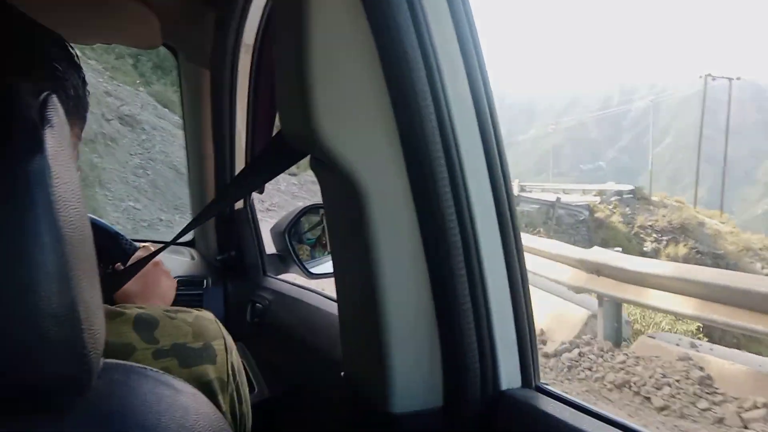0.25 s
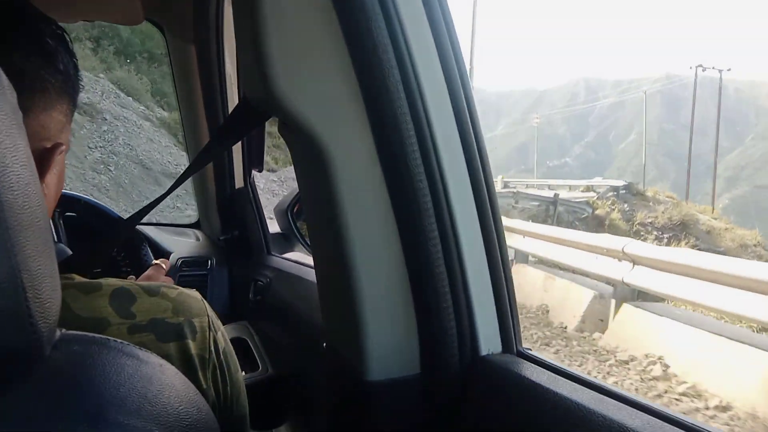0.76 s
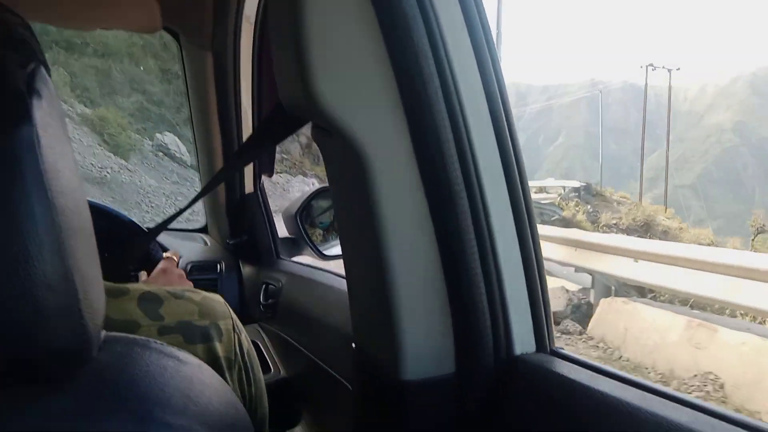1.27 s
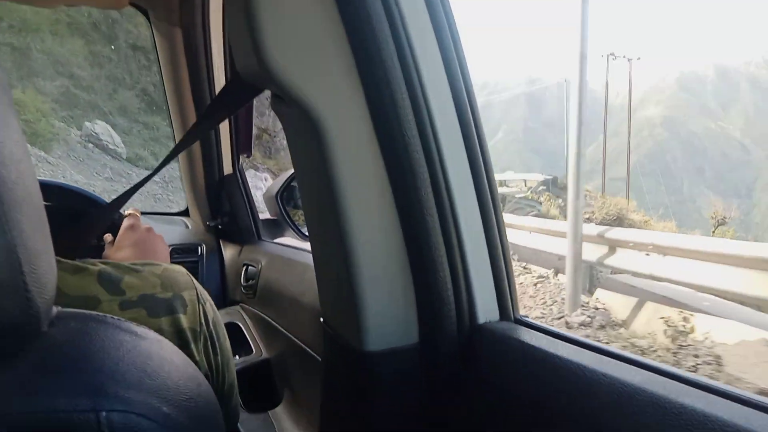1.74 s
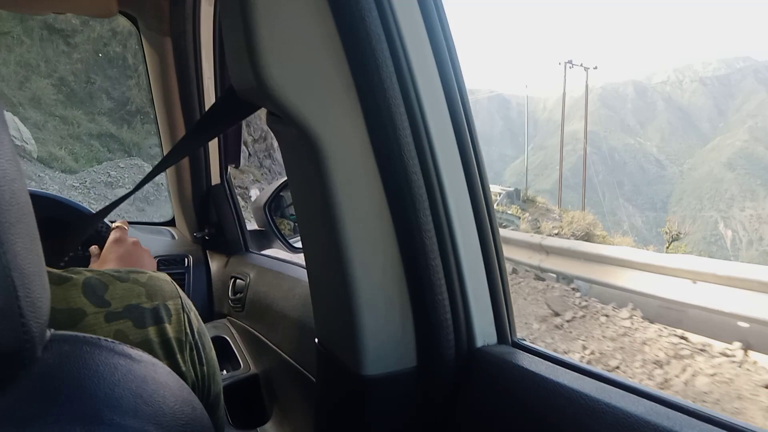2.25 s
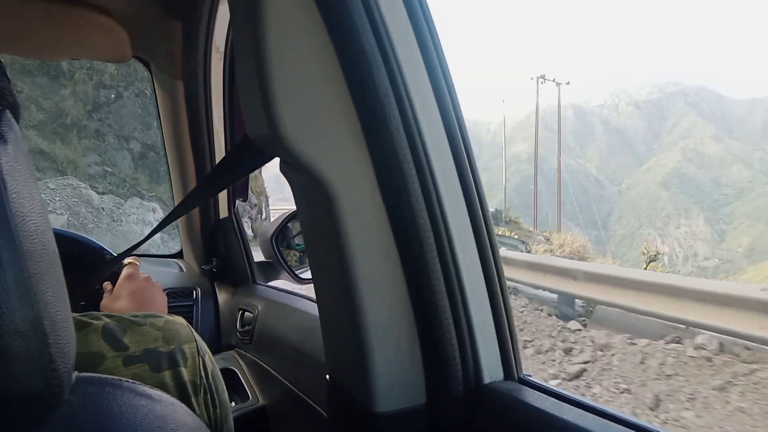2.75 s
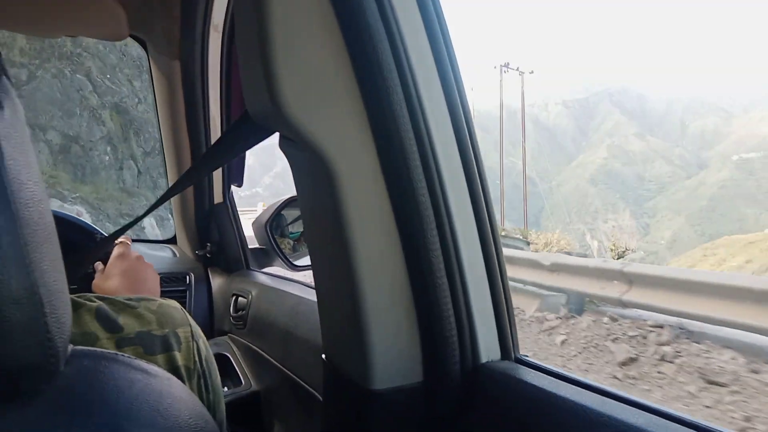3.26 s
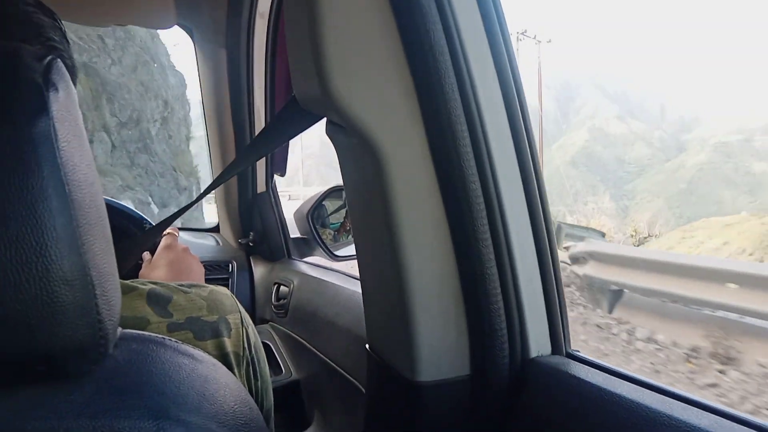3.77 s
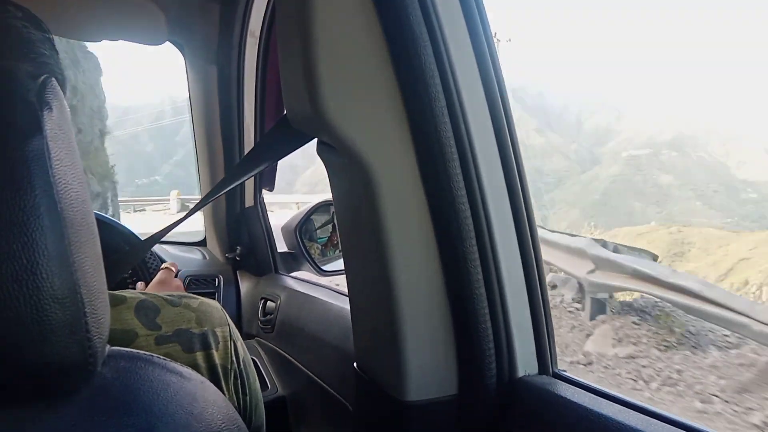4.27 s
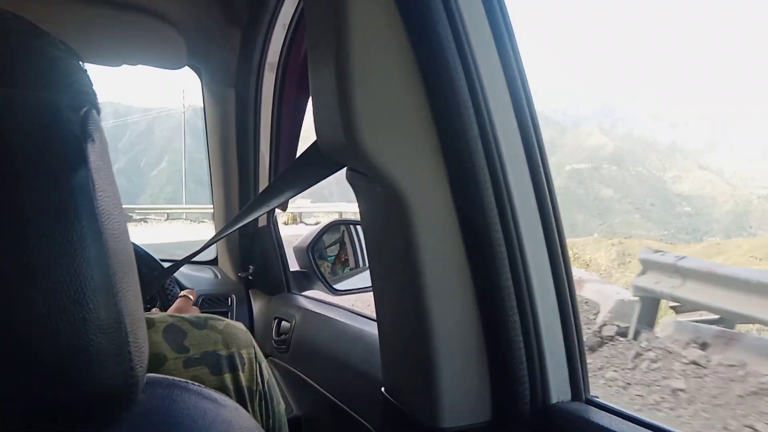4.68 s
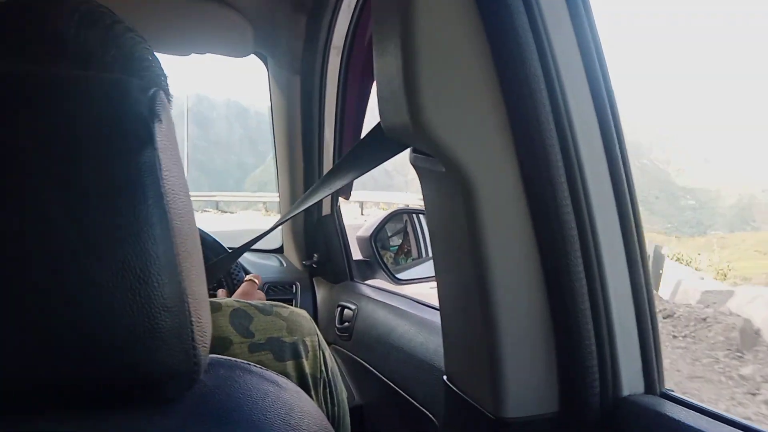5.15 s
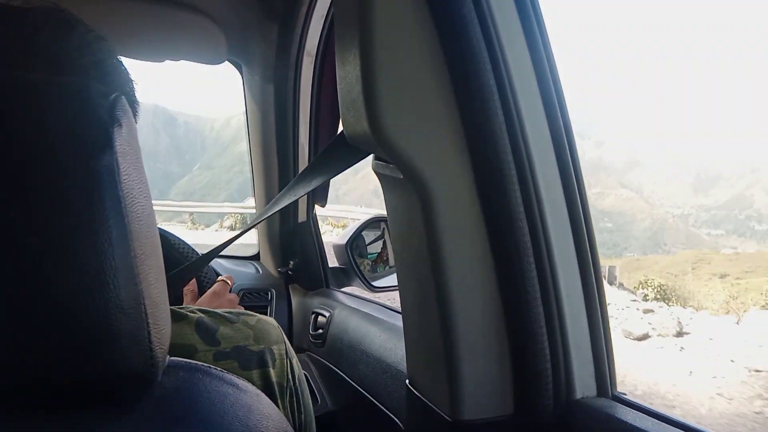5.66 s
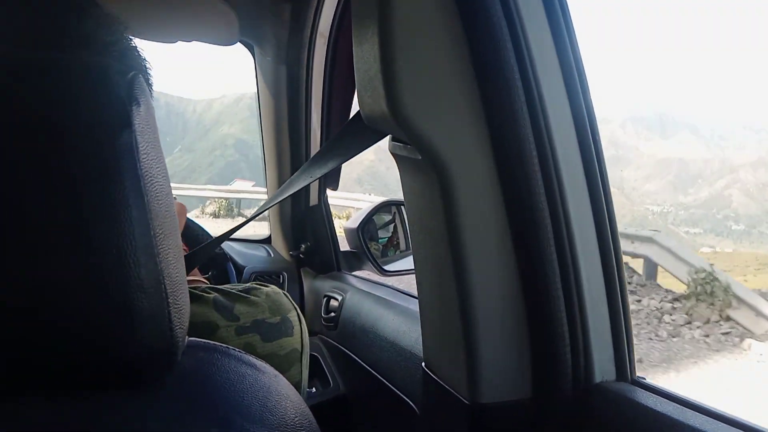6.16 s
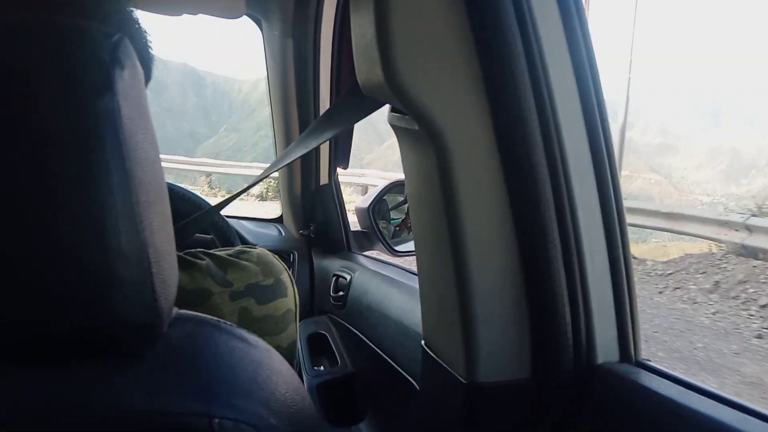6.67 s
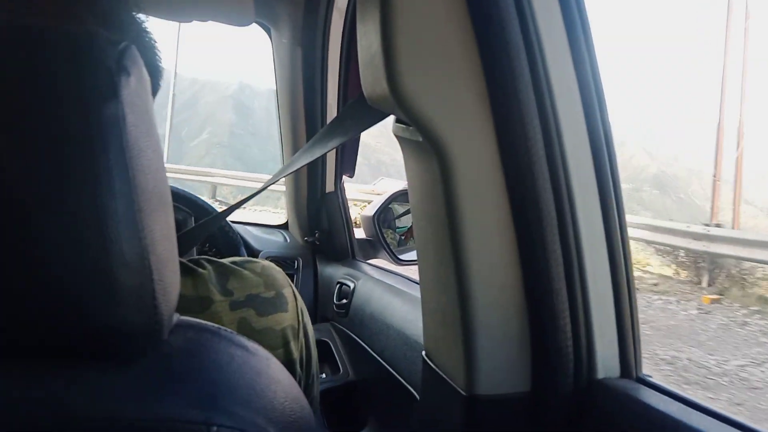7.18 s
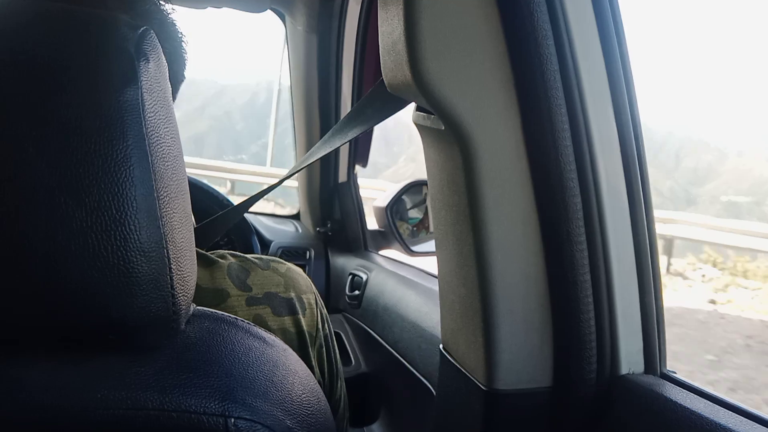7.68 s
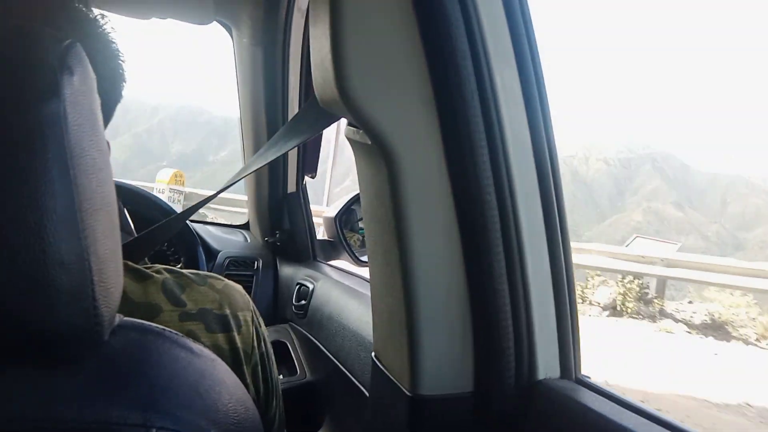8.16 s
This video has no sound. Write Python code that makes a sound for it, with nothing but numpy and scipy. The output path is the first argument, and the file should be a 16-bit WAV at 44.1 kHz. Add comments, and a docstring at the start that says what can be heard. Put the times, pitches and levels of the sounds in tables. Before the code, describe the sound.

Inside a moving car on a gritty mountain road, low cabin boom and tyre hiss, trim rattles and clicks, a brief two-note horn at the end.

```python
"""Inside a car on a rough mountain road: the cabin booms with road and engine, under a faint wavering whine.
Shaped noise makes the tyres hiss over grit, run quietly through a bend and reach grit again.
All along, short noise bursts make the trim click, snap and rustle, with one crisp scratch late on.
At the end the driver taps the two-note horn, two stacks of harmonics with shifting reflections."""
import sys
import numpy as np
from scipy import signal
from scipy.fft import rfft, irfft, next_fast_len
from scipy.io import wavfile
from scipy.ndimage import uniform_filter1d, map_coordinates

SR = 44100
rng = np.random.default_rng(int(sys.argv[2]) if len(sys.argv) > 2 else 0)


def bounce(signal):
    """Save signal as a 16-bit WAV file at the path given by the first command-line argument."""
    frames = np.transpose(np.atleast_2d(signal))
    limited = np.clip(frames, -1, 1)
    pcm = np.round(limited * 32767).astype(np.int16)
    wavfile.write(sys.argv[1], SR, pcm)


N = 371322
TOP_HZ = 15580  # upper limit of the sound

# bright tick of trim contacts and pebbles: freq_hz, relative level_db (per Hz)
CLICK_SPECTRUM = [(900, -19), (2000, 5.5), (3500, 0), (4600, -7), (5900, 10), (6600, -3.5), (7500, -8.5),
                  (10000, -13.5), (11500, -28), (13500, -30.5), (15300, -16)]


def amp(db):
    """Decibels to gain."""
    return 10 ** (np.asarray(db) / 20)


def unit(x):
    """Scale to rms 1."""
    return x / np.sqrt(np.mean(x ** 2) + 1e-20)


def along(points, hz):
    """Read (Hz, value) points on a log frequency axis."""
    f, v = np.transpose(points)
    return np.interp(np.log(hz + 1), np.log(f), v)


def curves(rows):
    """One value per sample for each column after the time."""
    s, *cols = np.transpose(rows)
    return [np.interp(np.arange(N) / SR, s, c) for c in cols]


def wobble(rate):
    """A smooth random curve, rate knots a second."""
    knots = rng.standard_normal(int(N * rate / SR) + 4)
    return map_coordinates(knots, [np.arange(N) * rate / SR])


def filtered(x, response):
    """x filtered by a response given as a function of frequency."""
    size = next_fast_len(N + SR // 2)
    hz = np.fft.rfftfreq(size, 1 / SR)
    return irfft(rfft(x, size) * response(hz), size)[:N]


def coloured(x, spectrum):
    """x through a (Hz, dB) spectrum, at rms 1."""
    return unit(filtered(x, lambda hz: amp(along(spectrum, hz))))


def noise(spectrum):
    """Fresh noise of rms 1 with this spectrum."""
    return coloured(rng.standard_normal(N), spectrum)


def steadied(x, span):
    """Keep the quick flutter of x but not its swells longer than span seconds."""
    power = np.abs(uniform_filter1d(x * x, max(int(span * SR), 2)))
    return x / np.sqrt(power + 1e-6)


def patchy(spectrum, patchy_db, size):
    """Noise of rms 1 whose bands swell and fade on their own; a larger size makes narrower, longer patches."""
    z = signal.stft(rng.standard_normal(N), nperseg=size)[2]
    field = uniform_filter1d(rng.standard_normal(z.shape), size=4, axis=0)  # smooth over frequency
    field = uniform_filter1d(field, size=6, axis=1)  # smooth over time
    mottled = signal.istft(z * amp(patchy_db * unit(field)), nperseg=size)[1][:N]
    return coloured(mottled, spectrum)


def crunches(rate, t60):
    """Envelope of many small impacts, rate a second: sudden starts, quick decays, uneven sizes."""
    sizes = amp(np.clip(4 * rng.standard_normal(N), -8, 7))
    starts = (rng.random(N) < rate / SR) * sizes
    decay = amp(-60 * np.arange(SR // 5) / SR / t60)
    return unit(signal.fftconvolve(starts, decay)[:N])


def jolts():
    """Each bump briefly raises or lowers the boom and the tread rumble: two curves in dB."""
    # bumps in the road: centre_s, boom_change_db, tread_change_db
    bump_rows = [(.13, 1, 5), (.85, 3.5, 7), (2.06, 7.5, 2.5), (2.17, 5.5, 3.5), (2.56, 7, -0.5),
                 (2.78, 3.5, -5), (3.0, 4.5, 0), (3.52, 4.5, 4.5), (3.89, 4, -4), (4.12, -0.5, 0.5),
                 (4.39, 1, 0), (5.19, 9.5, 0), (5.58, -0.5, 4.5), (7.07, 10, 5), (7.51, 5.5, 9),
                 (7.97, 5, -3)]
    width_s = 0.045  # from the peak of a change to 1/e of its dB
    t = np.arange(N) / SR
    return sum(np.outer(changes, np.exp(-((t - s) / width_s) ** 2)) for s, *changes in bump_rows)


def body():
    """Road and engine shake the cabin's air mode and its juddering panels; bumps move the boom up or down."""
    # spectra of the air mode, the panels and their judder: freq_hz, relative level_db (per Hz)
    boom_spectrum = [(15, -41), (30, -34.5), (45, -16), (60, -8), (72, -6.5), (84, 6), (98, -1.5),
                     (115, -14.5), (160, -41), (300, -91)]
    drone_spectrum = [(70, -44.5), (110, -2.5), (130, 1), (175, 0.5), (230, -12.5), (280, -12.5),
                      (350, -21), (480, -47), (800, -66.5), (2000, -86.5)]
    judder_spectrum = [(150, -33.5), (210, -1.5), (280, 1), (350, -5), (430, -11), (600, -48.5),
                       (1500, -120)]
    # how hard the road shakes the body, before bumps and offsets: time_s, boom_db, drone_db
    shake = [(0, -28, -27.5), (.5, -29.5, -33), (1.3, -28, -26.5), (1.5, -27, -32.5), (2.7, -26.5, -30),
             (3.4, -26, -33), (4.4, -25, -29), (4.9, -27.5, -33), (5.7, -25.5, -29.5), (6.2, -26, -32),
             (6.45, -31.5, -33), (7.4, -31.5, -39.5), (8.05, -29, -39.5), (8.42, -37.5, -36.5)]
    judder_db, judder_swing_db = -18.5, 3.5  # against the drone curve, and its scatter

    boom_db, drone_db = curves(shake)
    jolt_db = jolts()[0]
    boom_level = amp(boom_db + jolt_db + 0.94 + 0.46 * wobble(13))
    boom = boom_level * steadied(noise(boom_spectrum), span=0.12)
    drone_level = amp(drone_db + 0.26 * jolt_db + 0.5 + 1.92 * wobble(16))
    drone = drone_level * steadied(noise(drone_spectrum), span=0.13)
    judder_level = amp(drone_db + judder_db + judder_swing_db * wobble(14))
    judder = judder_level * noise(judder_spectrum)
    return boom + drone + judder


def tyres():
    """Tread rumble, roar, and a hiss in which bits of grit crunch and crackle and stray pebbles tick."""
    # spectra of the rumble, the roar and the hiss: freq_hz, relative level_db (per Hz)
    tread_spectrum = [(200, -24), (340, 2.5), (430, -3.5), (500, 2), (570, -3.5), (670, -4), (760, -16),
                      (1000, -13), (1150, -9), (2500, -71.5)]
    roar_spectrum = [(500, -27), (800, -5), (950, -5), (1150, 0.5), (1450, -3), (1800, -4), (2100, -6),
                     (2400, -8), (3200, -11), (6000, -67.5)]
    grit_spectrum = [(1000, -28), (2000, 2), (2700, -1.5), (3800, 3.5), (4600, -13), (5600, -4.5),
                     (6200, -4), (6600, -19), (7200, -8.5), (8500, -25.5), (10500, -30.5), (13000, -53.5),
                     (15300, -24.5)]
    # road surface, gritty, smooth through the bend, gritty again; before bumps and offsets:
    # time_s, tread_db, roar_db, grit_db
    surface = [(0, -42.5, -39.5, -49), (.45, -47.5, -41, -49.5), (.6, -41.5, -34.5, -50),
               (.72, -49, -37.5, -51.5), (.85, -43, -36, -49), (1.25, -45, -36.5, -50.5),
               (1.45, -45, -33.5, -46.5), (1.62, -43, -40, -45.5), (1.9, -44.5, -38.5, -42),
               (2.12, -46, -42, -44), (2.55, -44, -38.5, -47.5), (2.8, -49, -43, -48.5),
               (2.95, -52, -34.5, -47), (3.15, -49, -48.5, -53.5), (3.4, -54, -53, -61),
               (3.8, -52.5, -50, -61), (4.08, -41.5, -56.5, -59.5), (4.25, -50, -54.5, -62),
               (4.9, -54, -53.5, -68), (5.6, -52.5, -52.5, -62.5), (6.3, -57.5, -56, -67),
               (6.8, -52, -54, -60.5), (7.3, -59, -60, -53), (7.85, -57.5, -52.5, -44),
               (8.1, -48.5, -40.5, -43), (8.2, -51, -52, -44)]
    pebbles_per_s, pebble_t60_s = 8.6, 0.05  # stray stones ticking on the body
    pebble_db, pebble_follows = -71, 0.36  # level on average grit; dB gained per dB of grit curve

    tread_db, roar_db, grit_db = curves(surface)
    bumps = 0.71 * wobble(11)  # the uneven surface moves all three together
    tread_level = amp(tread_db + jolts()[1] + 1.9 * bumps)
    tread = tread_level * patchy(tread_spectrum, patchy_db=3.5, size=1024)
    roar = amp(roar_db - 4.5 + 1.8 * bumps) * patchy(roar_spectrum, patchy_db=3.0, size=512)
    roar *= np.abs(crunches(rate=200, t60=0.064)) ** 0.35  # the tread grinds over many small stones

    stones = (rng.random(N) < 2200 / SR) * rng.standard_normal(N)  # 2200 a second
    crackle = coloured(stones, grit_spectrum)
    crunch = crunches(rate=80, t60=0.06) * noise(grit_spectrum)
    hiss = patchy(grit_spectrum, patchy_db=4.5, size=1024) + amp(-14) * crackle + amp(-4.5) * crunch
    hiss *= amp(grit_db - 1.4 + 0.82 * bumps)

    pebbles = crunches(rate=pebbles_per_s, t60=pebble_t60_s) * noise(CLICK_SPECTRUM)
    pebbles *= amp(pebble_db + pebble_follows * (grit_db - grit_db.mean()))
    return tread + roar + hiss + pebbles


def whine():
    """A narrow whine from the running car that wanders in pitch and breaks up, and a broader swish above it."""
    # whine and the band of tyre noise above it, before offsets: time_s, whine_db, swish_db
    whine_levels = [(0, -49.5, -51), (.85, -46.5, -59), (1.5, -45.5, -51.5), (2.2, -51, -50),
                    (3.0, -52, -51.5), (4.0, -54.5, -52.5), (4.35, -56, -63), (4.8, -55, -67),
                    (5.3, -55.5, -61.5), (5.9, -57.5, -68), (6.4, -61.5, -69), (7.3, -59.5, -59),
                    (7.65, -58.5, -57.5), (8.1, -51, -50.5), (8.2, -49, -55)]
    whine_hz, half_width_hz, drift_hz = 1267, 37, 15

    whine_db, swish_db = curves(whine_levels)
    narrow = filtered(rng.standard_normal(N), lambda hz: 1 / (1 + ((hz - whine_hz) / half_width_hz) ** 2))
    drift_phase = 2 * np.pi * np.cumsum(drift_hz * wobble(8)) / SR
    analytic = signal.hilbert(narrow, next_fast_len(N))[:N]
    line = np.real(analytic * np.exp(1j * drift_phase))  # shift the band up and down in pitch
    swish = filtered(rng.standard_normal(N), lambda hz: 1 / (1 + np.abs((hz - 1780) / 260) ** 4))
    whine_level = amp(whine_db + 1.5 + 1.3 * wobble(25))
    swish_level = amp(swish_db - 0.5 + 2.2 * wobble(14))
    return whine_level * unit(line) + swish_level * unit(swish)


def floor_hiss():
    """A faint even hiss: steady shaped noise."""
    # freq_hz, relative level_db (per Hz)
    floor_spectrum = [(100, -1), (1000, 7), (2500, 1), (4800, 12), (6000, 17), (6700, 8.5), (7500, 5.5),
                      (10000, -5.5), (13000, -10), (14200, 0), (15300, 7)]
    return amp(-66.5) * noise(floor_spectrum)


def trim():
    """Loose trim rubs and clicks: every contact swells briefly, chatters in its own band and rings the door panel."""
    # loose trim, levels before offsets: contact_s, rub_db, rub_pitch_hz, click_db, rise_s (time constant)
    contacts = [(.134, -40.5, 3380, -47.5, .0007), (0.655, -36, 1410, -69, 0.024),
                (.808, -34, 1370, -45, .012), (.88, -39, 1820, -45.5, .006), (1.89, -38, 2490, -52, .008),
                (2.206, -37.5, 3080, -47.5, 0.002), (2.429, -32, 1700, -52, 0.00046),
                (2.845, -56, 3000, -46, 0.001), (3.689, -52.5, 6400, -69.5, .01),
                (4.036, -52, 6100, -52.5, .001), (4.15, -51.5, 5800, -59, 0.0022),
                (4.42, -53.5, 3140, -62, 0.0045), (4.565, -43, 2520, -66.5, 0.0022),
                (4.981, -55.5, 1900, -59, .006), (5.41, -52, 1750, -56.5, .005),
                (5.661, -39, 1660, -62.5, .0005), (5.688, -49, 2700, -63.5, .002),
                (6.203, -44, 6800, -70, .006), (6.449, -46.5, 2700, -60.5, 0.00055),
                (6.648, -44.5, 1500, -57.5, 0.013), (6.687, -46.5, 1740, -63, .004),
                (6.758, -31.5, 1350, -45, 0.0049), (6.774, -35.5, 1580, -43, 0.0024),
                (6.841, -43, 1710, -67, .0005), (6.923, -46, 1520, -50, .0007),
                (7.009, -44, 3800, -53, 0.0017), (7.021, -33, 1445, -58.5, 0.0051),
                (7.037, -31, 1320, -58, 0.0032), (7.042, -39, 2600, -61, 0.0068),
                (7.056, -42, 1300, -68, .002), (7.239, -47, 2400, -48, .0006),
                (7.321, -54, 3000, -52.5, .003), (7.438, -41, 2100, -49.5, .0006),
                (7.616, -56, 3500, -44.5, 0.0041), (7.778, -39, 1300, -57, 0.028),
                (7.814, -42, 6140, -44, .0022), (7.963, -34.5, 2010, -38, 0.011),
                (8.046, -35.5, 2170, -37.5, .012), (8.093, -37, 3630, -38, .006)]
    # resonances of the door trim: freq_hz, width_hz, level_db
    panel_modes = [(1073, 22, 2.5), (1255, 30, 13), (1620, 15, -2.5), (1900, 87, 6), (2285, 64, 5),
                   (2580, 68, 4.5), (2770, 58, 7), (3150, 55, 7.5), (3950, 130, 5.5)]
    # dull body of a knock: freq_hz, relative level_db (per Hz)
    thud_spectrum = [(150, -52), (350, 1.5), (700, 4.5), (1100, -13), (1600, -18), (4000, -72)]
    t60_s = 0.11  # every contact dies away at the same rate
    strike, strike_s = 0.76, 0.004  # extra strength of a rub around its contact, and its time constant
    direct_db = -2.5  # the part of a rub heard without the panel

    t = np.arange(N) / SR
    rubs, thuds, clicks = np.zeros(N), np.zeros(N), np.zeros(N)
    for s, rub_db, rub_hz, click_db, rise in contacts:
        near = slice(max(int((s - 0.1) * SR), 0), int((s + 0.3) * SR))
        age = t[near] - s
        shape = np.exp(np.minimum(age, 0) / rise) * amp(-60 * np.maximum(age, 0) / t60_s)
        band = signal.butter(3, [rub_hz * 0.75, rub_hz * 1.3], btype="bandpass", fs=SR, output="sos")
        scrape = unit(signal.sosfilt(band, rng.standard_normal(len(age))))
        hit = 1 + strike * np.exp(-np.abs(age) / strike_s)
        rubs[near] += amp(rub_db - 5) * shape * hit * scrape
        thuds[near] += amp(rub_db - 13.0) * shape * (rub_hz < 1600)  # only the heavier, lower contacts thud
        clicks[near] += amp(click_db) * shape

    def ring(hz):
        """Direct sound plus the panel's resonances."""
        total = amp(direct_db)
        for f, width, db in panel_modes:
            damping = 1j * hz * width
            total = total + amp(db) * damping / (f * f - hz * hz + damping)
        return total

    chatter = 0.53 + 0.5 * crunches(rate=700, t60=0.017)  # a loose part strikes many times in quick succession
    knocks = thuds * noise(thud_spectrum)
    ticks = amp(1.5 * wobble(300)) * clicks * noise(CLICK_SPECTRUM)
    return filtered(chatter * rubs, ring) + knocks + ticks


def snaps():
    """Trim clips snap: a sharp, bright crack that is gone at once."""
    # hard little snaps of plastic trim: start_s, level_db
    snap_rows = [(.135, -47), (.163, -53), (.312, -51), (6.193, -48.5), (6.201, -44.5), (6.449, -51.5),
                 (6.773, -37), (7.011, -46.5), (7.238, -44), (7.812, -40)]
    # freq_hz, relative level_db (per Hz)
    snap_spectrum = [(1500, -12.5), (3000, -0.5), (4600, -4), (5900, 9), (7500, -1), (10000, -8.5),
                     (12500, -17), (15300, -9)]
    t60_s = 0.018
    t = np.arange(N) / SR
    shape = sum(amp(db - 60 * np.abs(t - s) / t60_s) * (t >= s) for s, db in snap_rows)
    return shape * noise(snap_spectrum)


def scratch():
    """One crisp scratch close to the microphone: a short swell of bright noise."""
    # freq_hz, relative level_db (per Hz)
    crisp_spectrum = [(2500, -24), (4500, 11), (7000, -11), (10000, -12), (12500, 3.5), (15300, 3.5)]
    centre_s, width_s = 6.773, 0.012
    shape = np.exp(-((np.arange(N) / SR - centre_s) / width_s) ** 2)
    return amp(-46) * shape * noise(crisp_spectrum)


def horn():
    """Two buzzing diaphragms a major third apart; uneven strokes and shifting reflections roughen their overtones."""
    # horn units: on_s, off_s, pitch_hz, fundamental_db, overtones_db, fundamental_waver_db
    horn_units = [(8.169, 8.361, 335.8, -26.5, -25, 1), (8.162, 8.378, 424.2, -37, -28.4, 3.5)]
    # what the horn flares pass into the cabin: freq_hz, relative level_db
    flare = [(650, -31), (850, -10), (1000, -16.5), (1280, -9), (1360, -41), (1700, -1), (2010, -4),
             (2120, -11), (2400, -15), (2550, -10), (2680, 5), (2970, 8), (3030, 3.5), (3330, 2), (3390, 5),
             (3700, -9), (4030, -10), (4250, -9), (4500, -22), (4700, -14), (5100, -13), (5400, -10.5),
             (6000, -3.5), (6400, -12), (6750, -15), (7300, -12.5), (10000, -21), (12500, -37.5),
             (15400, -20.5)]
    fade_hz, smear_hz = 70, 2200  # pace of the reflections; where they grow as strong as the direct sound
    bite_s, bite_rise_s = 8.185, 0.0066  # when the overtones are half in, and their time constant

    t = np.arange(N) / SR
    hum, blare = np.zeros(N), np.zeros(N)
    for on, off, pitch_hz, low_db, high_db, waver_db in horn_units:
        near = t > on - 0.05
        u = t[near]
        swing = np.exp(-np.maximum(u - off, 0) / 0.012) / (1 + np.exp((on - u) / 0.004))
        # the strokes scatter in time by a small part of a cycle
        scatter = 0.003 * wobble(300) + 0.014 * wobble(40)
        phase = 2 * np.pi * (pitch_hz * u + scatter[near])
        k = np.arange(2, int(TOP_HZ / pitch_hz))[:, None]  # overtone numbers
        gains = amp(along(flare, k * pitch_hz))

        # reflections from the passing roadside beat against each overtone, more so the higher it is
        knots = rng.standard_normal((2, len(k), int(fade_hz * len(u) / SR)))
        real, imag = signal.resample(knots, len(u), axis=2) / np.sqrt(2)
        paths = 1 + (real + 1j * imag) * k * pitch_hz / smear_hz
        paths_rms = np.sqrt(np.mean(np.abs(paths) ** 2, axis=1, keepdims=True))
        paths *= np.exp(2j * np.pi * rng.random(k.shape)) / paths_rms  # random starting phases
        partials = gains * np.real(paths * np.exp(1j * k * phase))
        overtones = np.sum(partials, axis=0) / np.linalg.norm(gains)

        bite = 1 / (1 + np.exp((bite_s - u) / bite_rise_s))  # the tone turns bright
        waver = amp(waver_db * wobble(40))[near]
        hum[near] += np.sqrt(2) * amp(low_db) * swing * waver * np.sin(phase)
        blare[near] += np.sqrt(2) * amp(high_db) * swing * bite * overtones
    return hum + blare + cabin(amp(-9) * blare + amp(-18) * hum)


def cabin(x):
    """The short echo of the cabin and the road around it: a noise tail whose bands decay at their own rates."""
    # freq_hz, t60_s
    decay_times = [(200, 0.26), (1500, 0.14), (3000, 0.44), (6000, 0.11), (12000, 0.15)]
    hz, t, z = signal.stft(rng.standard_normal(SR // 3), SR, nperseg=256)
    decay = amp(-60 * t / along(decay_times, hz)[:, None])
    tail = signal.istft(z * decay, SR, nperseg=256)[1]
    return signal.fftconvolve(x, tail / np.linalg.norm(tail))[:N]


def scene():
    """Everything as heard from the back seat, over a faint even hiss."""
    ride = body() + tyres() + whine() + floor_hiss()
    rattles = trim() + snaps() + scratch()
    return (ride + rattles + horn())[None]


def record(dry):
    """The phone keeps nothing above its band limit."""
    return filtered(dry[0], lambda hz: hz < TOP_HZ)[None]


dry = scene()
out = record(dry)
bounce(out)
```